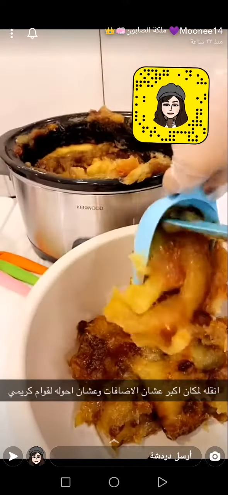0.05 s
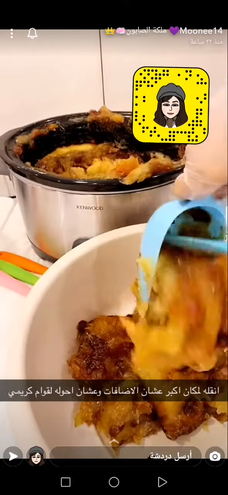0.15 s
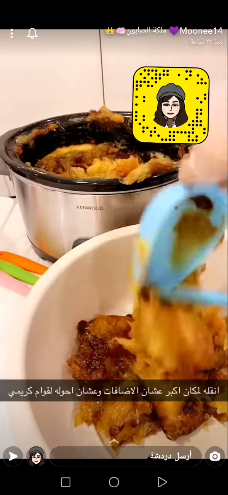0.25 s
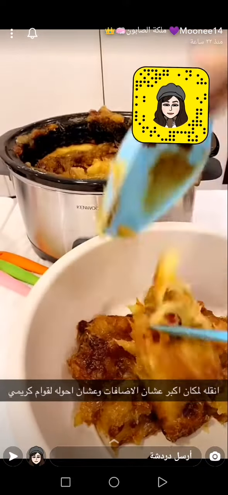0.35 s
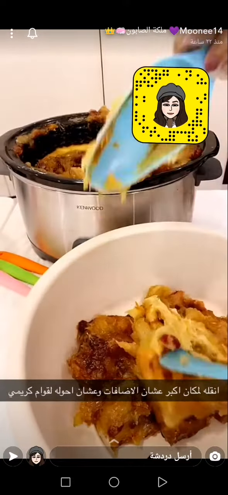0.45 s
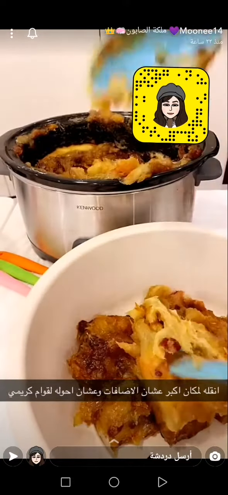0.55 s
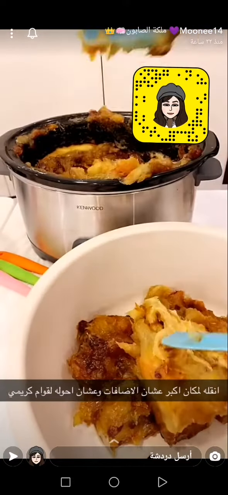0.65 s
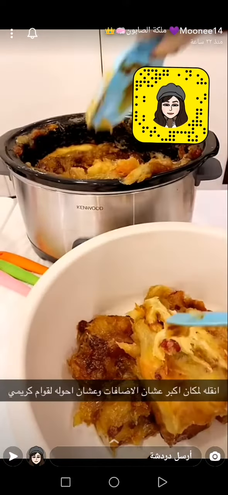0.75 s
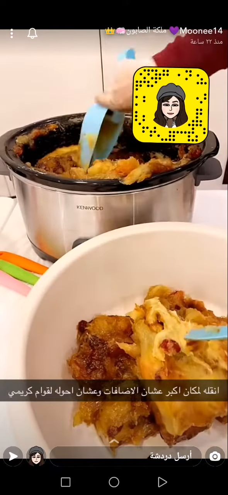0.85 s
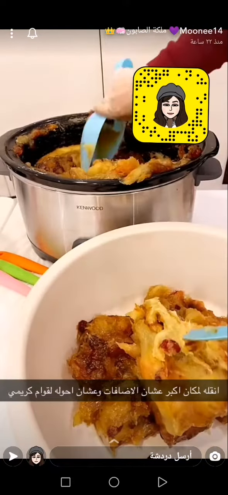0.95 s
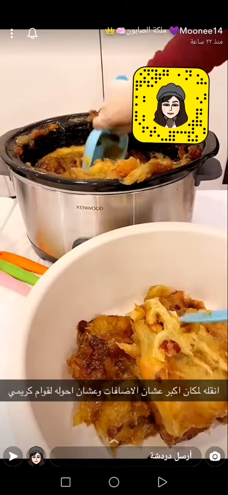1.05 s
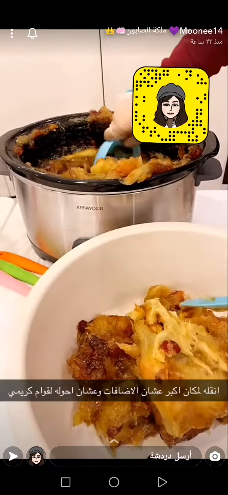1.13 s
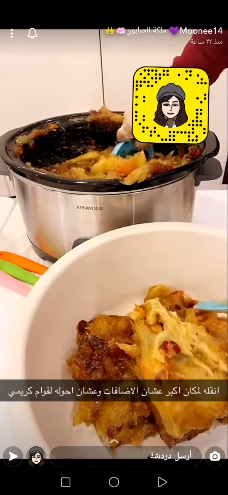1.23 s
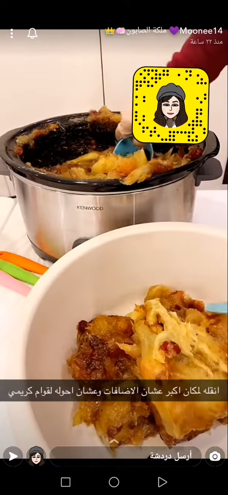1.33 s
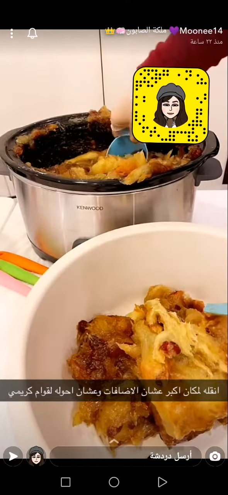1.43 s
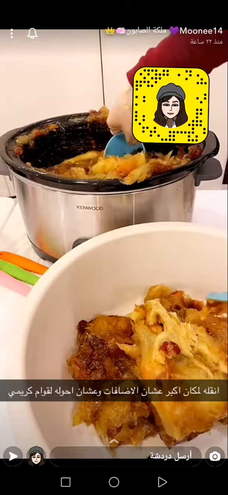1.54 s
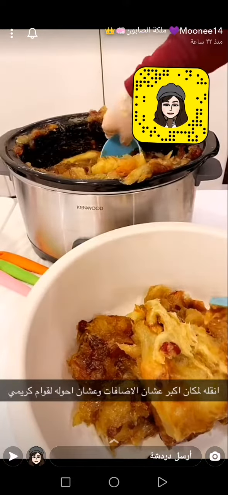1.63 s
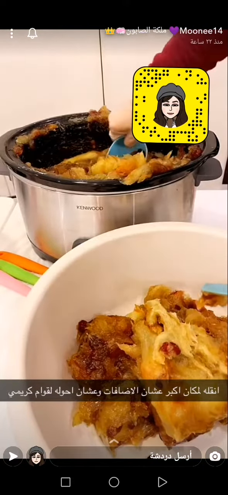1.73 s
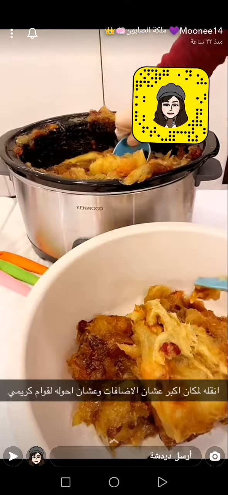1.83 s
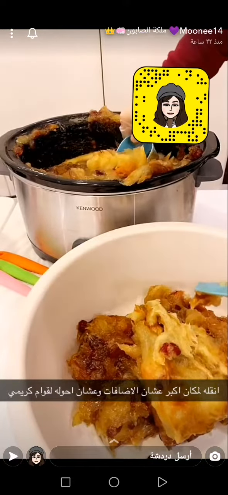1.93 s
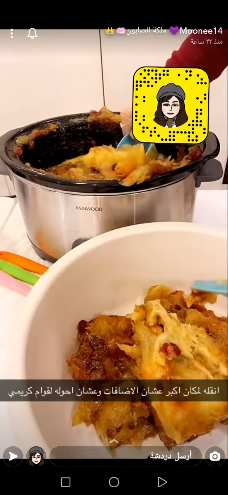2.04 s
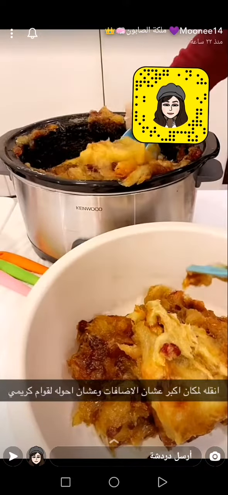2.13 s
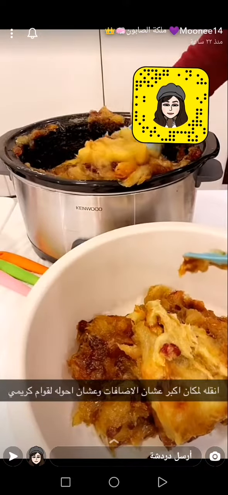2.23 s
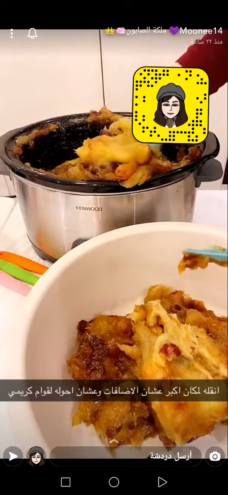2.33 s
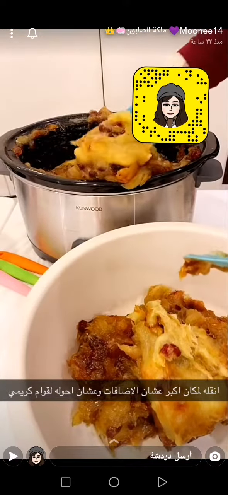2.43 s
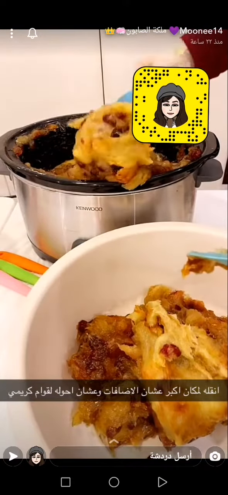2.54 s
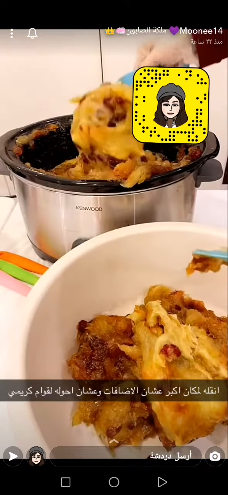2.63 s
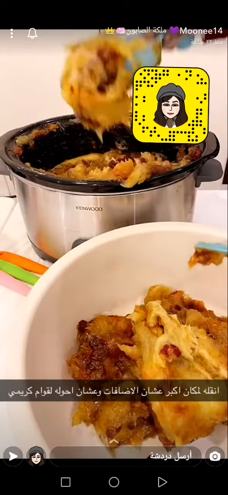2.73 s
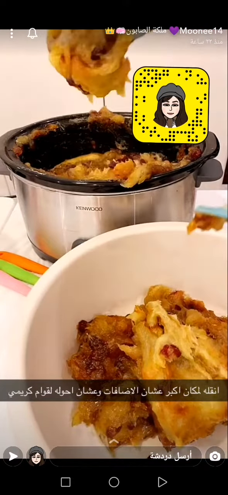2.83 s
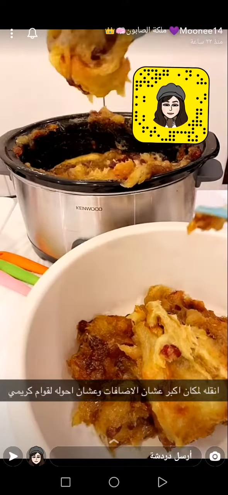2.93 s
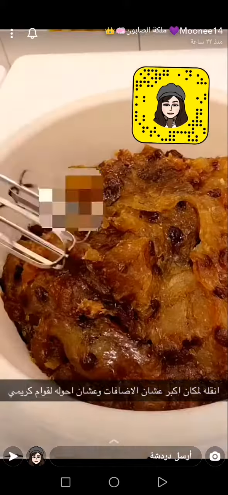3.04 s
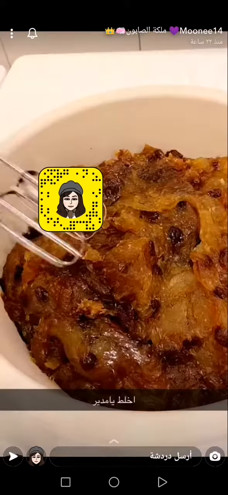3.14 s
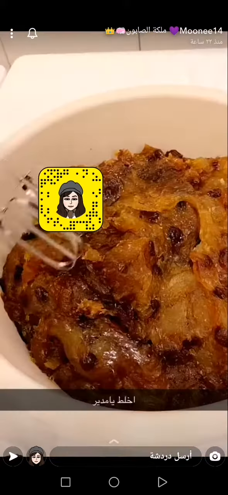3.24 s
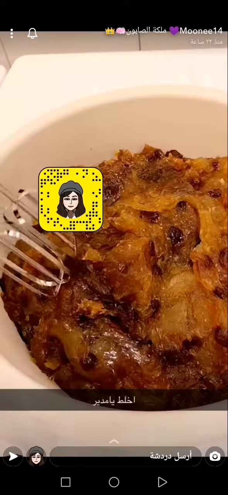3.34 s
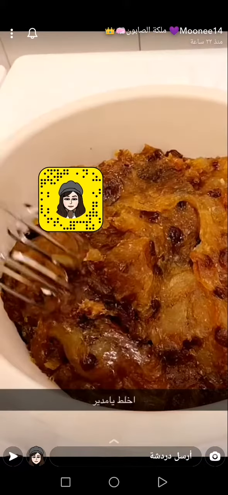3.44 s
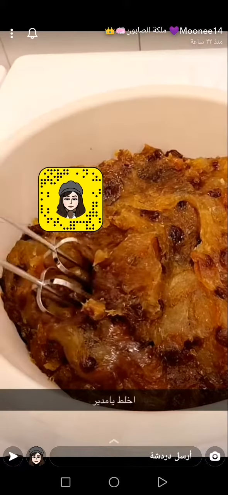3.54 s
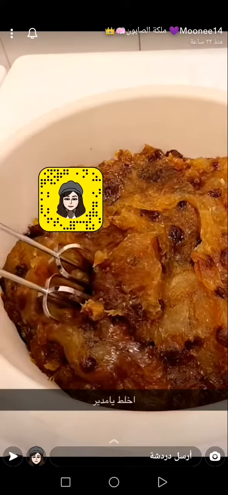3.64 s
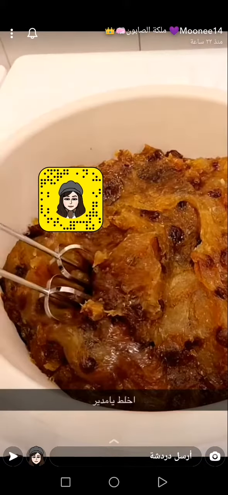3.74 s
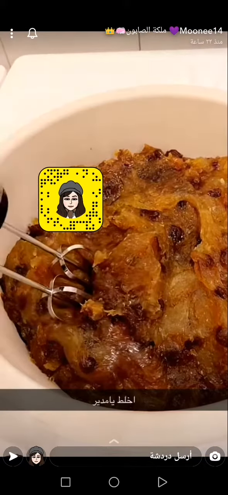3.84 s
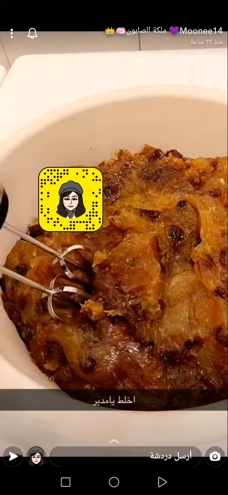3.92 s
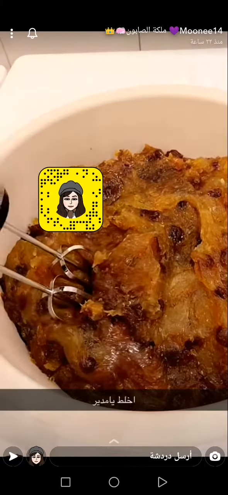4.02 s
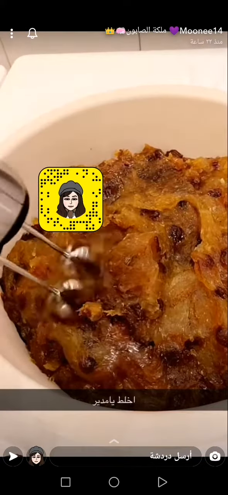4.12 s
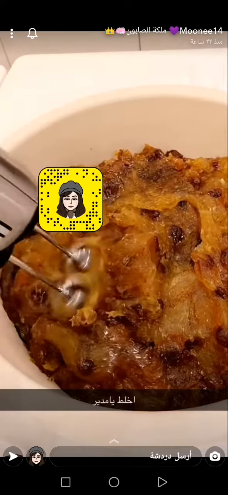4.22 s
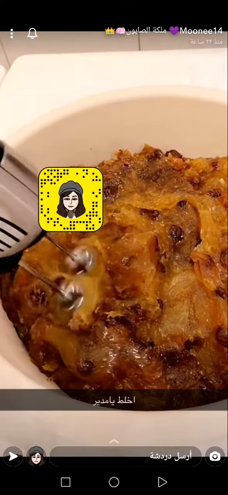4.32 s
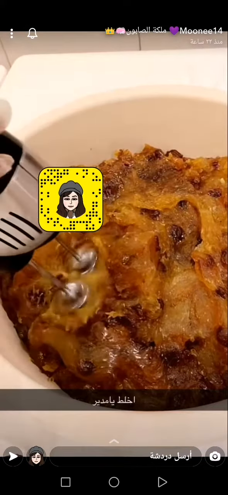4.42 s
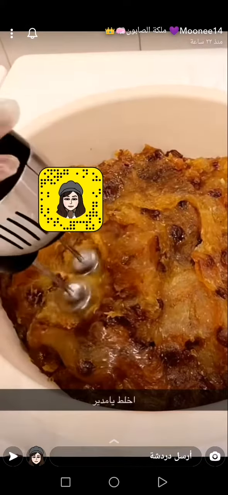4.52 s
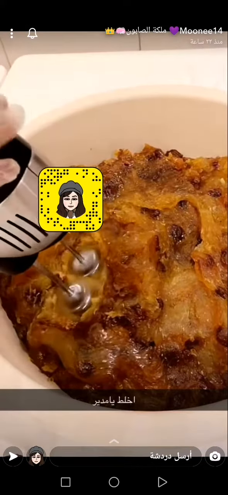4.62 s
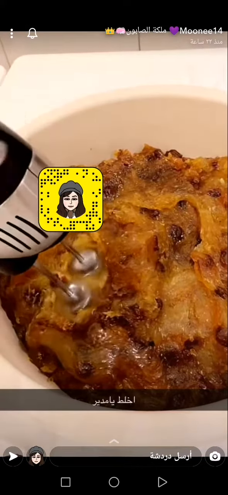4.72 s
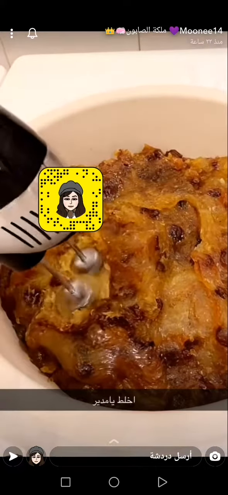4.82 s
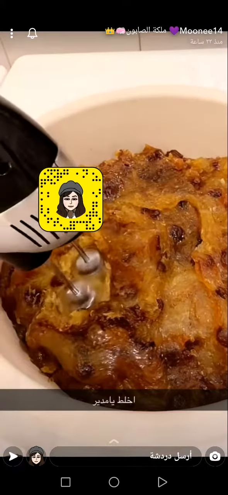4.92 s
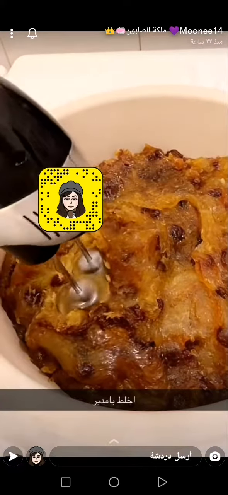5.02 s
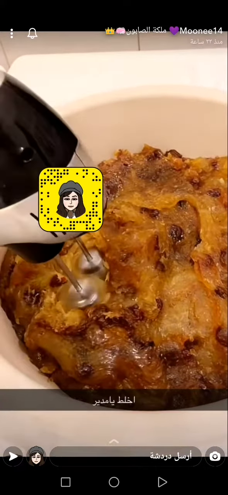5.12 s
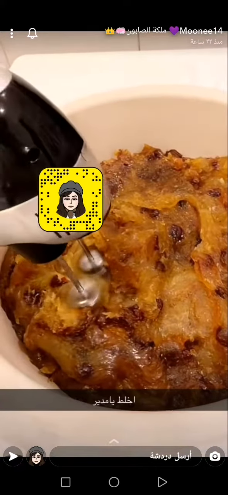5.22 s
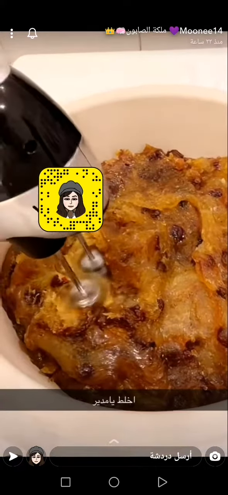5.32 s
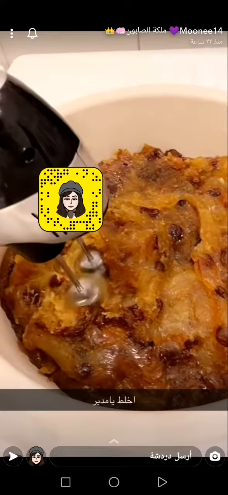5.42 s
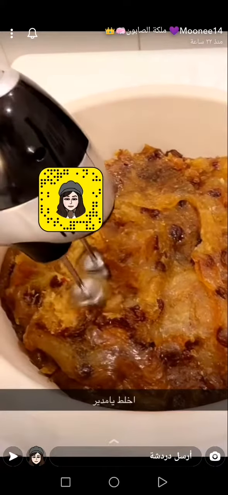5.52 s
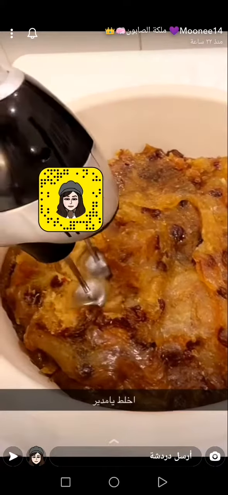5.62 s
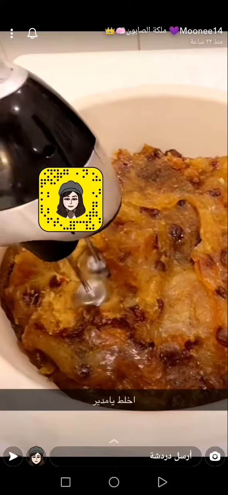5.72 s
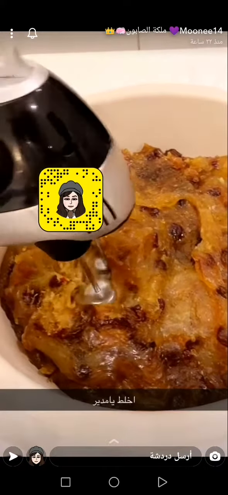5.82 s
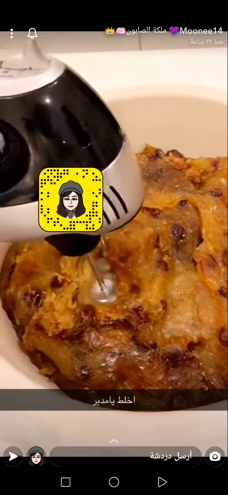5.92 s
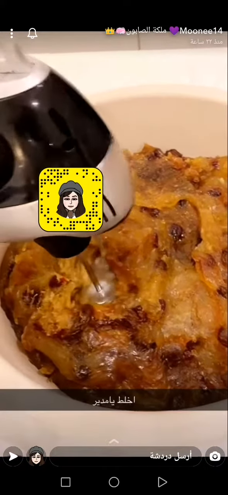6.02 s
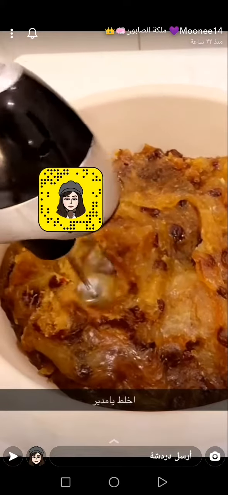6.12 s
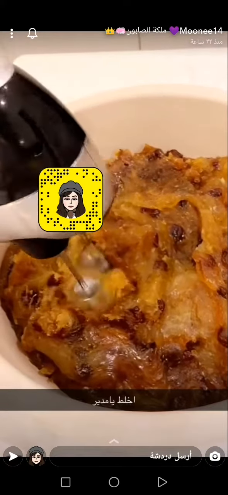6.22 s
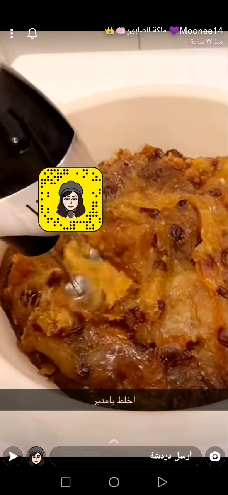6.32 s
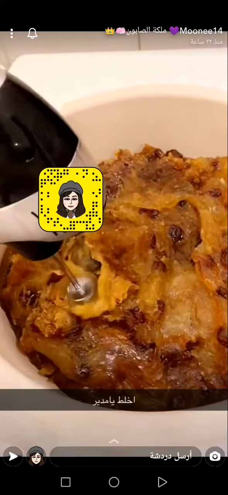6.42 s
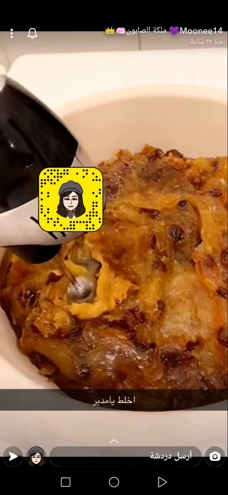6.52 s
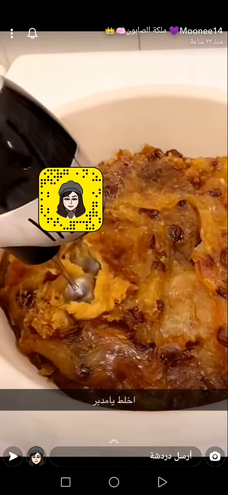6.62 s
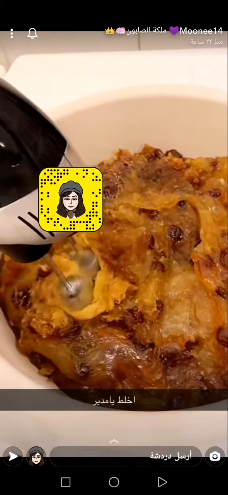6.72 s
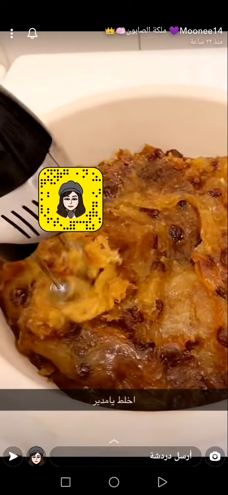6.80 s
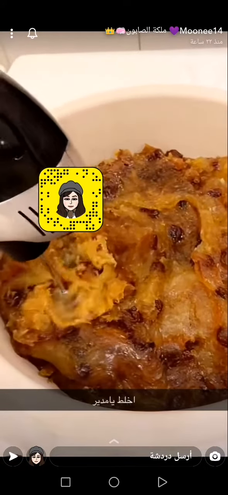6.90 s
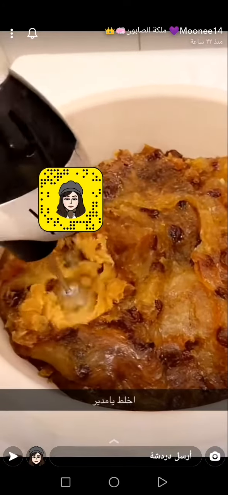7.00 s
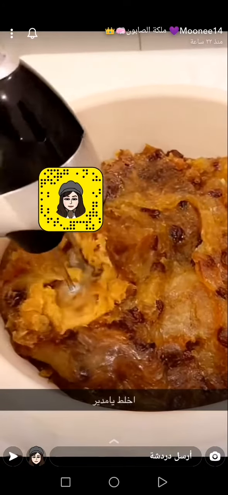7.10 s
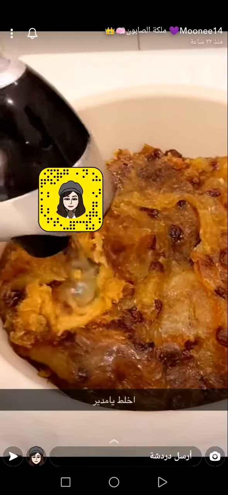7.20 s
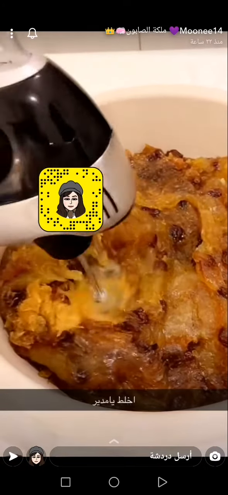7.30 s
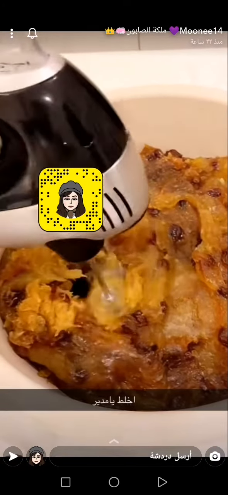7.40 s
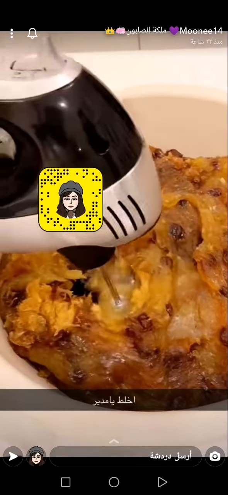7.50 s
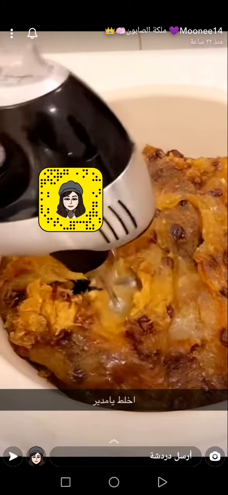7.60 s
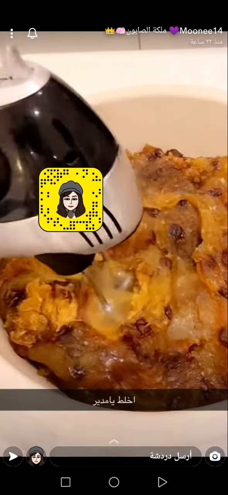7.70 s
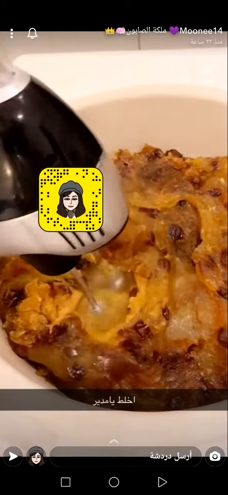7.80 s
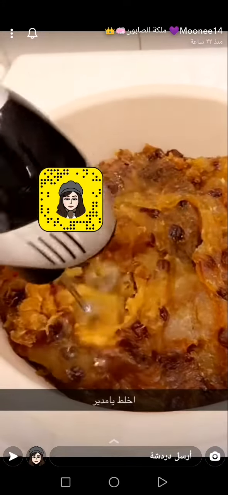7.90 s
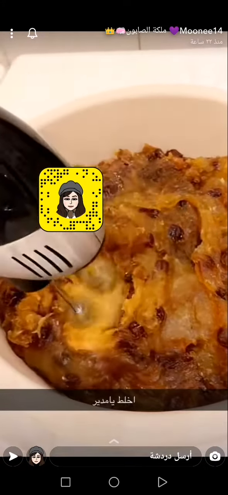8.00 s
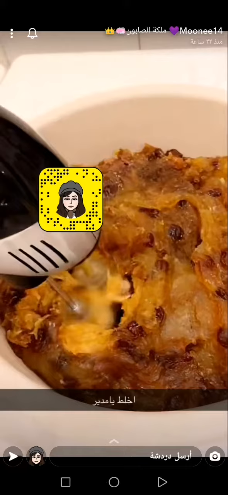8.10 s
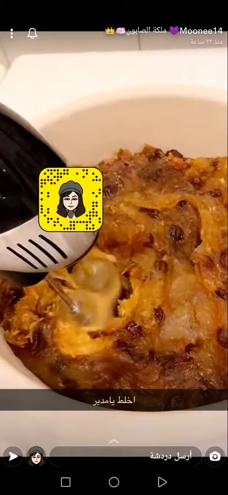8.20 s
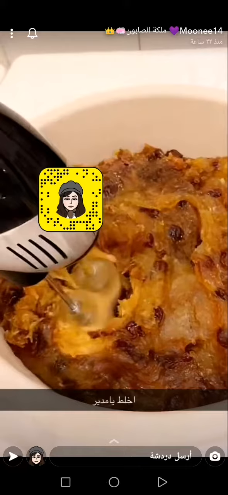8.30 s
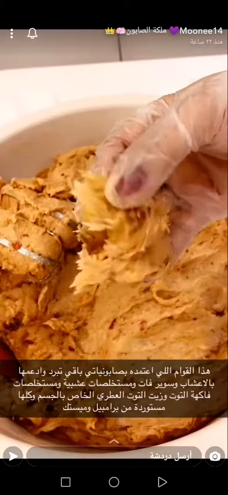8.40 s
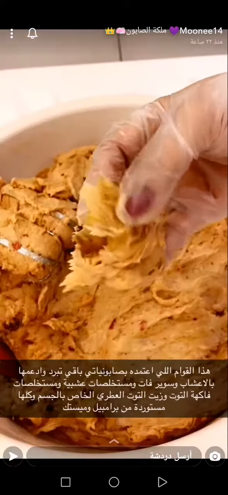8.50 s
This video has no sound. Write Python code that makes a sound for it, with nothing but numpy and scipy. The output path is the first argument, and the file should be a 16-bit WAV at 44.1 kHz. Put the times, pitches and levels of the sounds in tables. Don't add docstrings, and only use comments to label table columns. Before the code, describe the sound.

A quiet kitchen heard by one close microphone, centred, with low room tone and a faint cooler hum that swells and fades. From 0 to 3 seconds sticky paste is scooped, scraped and dropped: soft hissing rubs, wet smacks and small dull taps, busiest around 0.3 to 1.2. At about 3.1 a total silence lasts roughly a tenth of a second. Until 4.2 there are sparse rubs and beater knocks, the firmest near 3.8. At 4.26 a switch snaps loudly; the motor jolts, gears knock around 4.5, and a whine climbs quickly to a high, harsh, buzzing tone by about 4.8. The mixer then beats steadily, its pitch wavering slightly, with rushing fan air, gritty gears and low bowl rumble that thickens near 6.0 and 7.6. At 8.4 it cuts off dead; after a brief silence only faint kitchen tone remains.

```python
import sys
import numpy as np
from scipy import signal
from scipy.fft import rfft, irfft, next_fast_len
from scipy.io import wavfile
from scipy.ndimage import uniform_filter1d

SR = 44100
rng = np.random.default_rng(int(sys.argv[2]) if len(sys.argv) > 2 else 0)


def volts_from_db(level):
    exponent = np.asarray(level, float) / 20
    return 10 ** exponent


def generate_wav(sig):
    pcm = np.round(np.clip(np.atleast_2d(sig).T, -1, 1) * 32767).astype(np.int16)
    wavfile.write(sys.argv[1], SR, pcm)


N = 377055
T = np.arange(N) / SR

# (frequency [Hz], density [dB per Hz])
ROOM_SPECTRUM = [(15, -71.5), (25, -40.5), (65, -12.5), (98, -13.5), (123, 0.5), (160, -7.5), (227, -3),
                 (259, -11), (355, -7), (494, -14), (900, -19), (1170, -28.5), (1980, -120)]
ROOM_DB, MIC_HISS_DB = -58, -79
# (frequency [Hz], level [dB])
COOLER_HUM = [(134.6, -65), (188.4, -73), (355.3, -75.5), (410, -72)]
# (start [s], length [s], level [dB])
COOLER_SWELLS = [
    (-0.1, 0.55, -64.5),
    (0.66, .15, -68),
    (1.064, 0.6, -60),
    (2.25, 0.634, -61),
    (3.238, .83, -60.5),
    (4.21, 5.0, -63),
]
SWELL_HZ, SWELL_RISE_DB_PER_S, SWELL_FALL_DB_PER_S = 231.4, 78, 180

# (peak time [s], time to fade 10 dB [s], or if negative to rise 10 dB, hiss level
# [dB], dull level [dB])
PASTE_STROKES = [(0.04, .3, -67, -67.5), (0.265, 0, -62, -67), (0.368, .05, -52, -57.5),
                 (0.525, -0.03, -51, -56), (0.668, -0.1, -69, -82), (0.82, 0.9, -66, -68.5),
                 (1.095, 0.11, -55.5, -58), (1.26, 0.16, -59.5, -60.5), (1.4, 0.24, -62.5, -64),
                 (1.53, 0.1, -60, -61), (1.72, 0.2, -65, -65), (1.915, 0.02, -71.5, -58),
                 (2.047, .08, -67, -65.5), (2.139, 0.14, -61, -62.5), (2.258, 0.2, -72, -65),
                 (2.5, 0.4, -65.5, -65), (2.66, 0.04, -62.5, -68), (2.73, -0.04, -66, -63),
                 (2.85, 0.15, -66, -70), (3.28, 0.1, -66, -74.5), (3.527, 0.25, -68.5, -70),
                 (3.705, -0.05, -61, -70), (3.83, 0.02, -70, -55), (4.0, 0.5, -67.5, -73),
                 (4.19, 1, -80, -71)]
# (frequency [Hz], density [dB per Hz])
RUB_HISS = [(2600, -10), (3400, 0), (6000, -1), (9000, -3.5), (13000, -3.5), (15900, -13.5)]
# (frequency [Hz], density [dB per Hz])
RUB_BODY = [(600, -8.5), (1000, -3), (1500, -1.5), (2200, -5), (3000, -6.5), (4200, -19.5)]
STROKE_RISE_SHARE, REST_HISS_DB, REST_DULL_DB = 0.63, -78.5, -74

# (time [s], peak [dB], ring [Hz], snap [dB])
UTENSIL_TAPS = [(0.1187, -42, 1030, -63), (0.2983, -54, 3490, -52), (0.3237, -45, 2440, -52),
                (0.519, -38, 1460, -42), (0.6769, -50, 826, -55), (0.7921, -47, 2130, -64),
                (0.862, -46, 3000, -70.5), (1.0017, -41, 3170, -62), (1.085, -39.5, 950, -61),
                (1.1912, -52, 4970, -61), (1.9036, -52.5, 2300, -70), (2.0273, -41.5, 3340, -65),
                (2.1092, -50, 2060, -59), (2.1306, -43, 1040, -52), (2.4269, -46, 867, -64),
                (2.644, -52, 942, -60), (2.7153, -48.5, 950, -60), (2.8505, -56, 988, -66),
                (2.9263, -44, 829, -67), (3.206, -46.5, 945, -62), (3.2521, -47, 877, -53),
                (3.518, -40, 784, -57), (3.698, -40.5, 4100, -46), (3.8203, -32.5, 1573, -50.5),
                (3.9894, -38, 3870, -80)]
# (time [s], peak [dB], ring [Hz], snap [dB])
SWITCH_SNAPS = [
    (4.241, -40, 498, -56),
    (4.261, -18.5, 2273, -48),
    (4.263, -20.5, 2280, -42),
    (4.267, -21, 630, -55),
    (4.273, -21.5, 447, -44),
    (4.28, -29, 1550, -45.5),
]
# (time [s], peak [dB], ring [Hz], snap [dB])
GEAR_CATCHES = [
    (4.495, -21, 2460, -40),
    (4.517, -19.5, 2510, -40),
    (4.564, -19.5, 2480, -39),
]

# (time [s], settled slot tone [Hz])
SETTLED_PITCH = [(4.7, 5165), (5.4, 5275), (5.72, 5220), (5.85, 5258), (5.96, 5115), (6.09, 5150),
                 (6.3, 5445), (6.45, 5335), (6.82, 5405), (6.93, 5150), (7.2, 5525), (7.35, 5575),
                 (7.52, 5160), (7.68, 5190), (7.92, 5615), (8.1, 5360), (8.22, 5365), (8.32, 5495)]
# (time [s], whine facing the microphone [dB], shaft leaning on the bowl [dB], beaters'
# depth in the paste [dB])
HAND_GRIP = [(4.75, -33, -51, -1), (4.92, -28, -51.5, -1.5), (5.1, -30, -52, -2), (5.35, -28, -48.5, -2),
             (5.55, -25, -51.5, -0.5), (6.02, -24, -45, 5), (6.14, -23.5, -42, 2.5), (6.3, -28, -72, -1),
             (6.62, -26, -62, 2.5), (6.8, -27.5, -56, -2.5), (6.91, -31.5, -61, -1.5),
             (7.1, -29.5, -60, -1.5), (7.3, -30, -55, -3), (7.42, -25, -58, -0.5), (7.62, -33, -51, 5),
             (7.86, -31.5, -59, -6), (8.1, -32, -65.5, -3), (8.39, -31.5, -64, -3.5)]
SLOTS, MAINS_PULSE_HZ, PULSE_TOP_S = 12, 120.07, 5.1059
START_S, SPIN_UP_S, SPIN_UP_HZ = 4.28, 0.165, 3810
BITE_S, BITE_LENGTH_S, BITE_HZ = 4.51, 0.075, 350

# (frequency [Hz], density [dB per Hz])
BOWL_RUMBLE = [(24, -59.5), (40, -27), (59, -34), (90, -7), (129, -8.5), (183, -0.5), (297, -12),
               (330, -35), (430, -43.5), (730, -120)]
# (frequency [Hz], density [dB per Hz])
GEAR_NOISE = [(180, -44.5), (300, -19), (368, -3.5), (1080, -5.5), (1150, -4), (1360, -5.5), (2800, -6),
              (3640, -38.5), (6160, -120)]
# (frequency [Hz], width [Hz], level [dB])
GEAR_MODES = [(1014, 29, -5.5), (1158, 11, 4), (1540, 55, -8), (2280, 55, -8.5)]
# (frequency [Hz], density [dB per Hz])
CASING_NOISE = [(2500, -24), (2900, -8), (3150, -4.5), (3450, -3), (3800, -4), (4150, -8.5), (4600, -4.5),
                (5200, -6.5), (5650, -7), (5950, -9.5), (6250, -25.5)]
# (frequency [Hz], width [Hz], level [dB])
CASING_MODES = [(3065, 29, 2), (3200, 20, 1), (3277, 60, -2), (3802, 56, 3), (3916, 30, 3), (4720, 37, -3)]
# (frequency [Hz], density [dB per Hz])
VENT_AIR = [(6200, -1), (6600, -6), (7000, -2.5), (8000, -3), (8640, -4), (9180, -2.5), (9840, -3.5),
            (10500, -2.5), (11500, -8.5), (12800, -5), (14400, -7.5), (15100, -5.5), (15900, -6.5)]
# (level [dB], power of speed [-], switch-on burst [dB])
CASING_STRENGTH = (-31.0, 2.17, -33)
# (level [dB], power of speed [-], switch-on burst [dB])
GEAR_STRENGTH = (-37.5, 0.9, -43)
# (level [dB], power of speed [-], switch-on burst [dB])
VENT_STRENGTH = (-37.5, 1.85, -42)
# (level [dB], power of speed [-], switch-on burst [dB])
BOWL_STRENGTH = (-44, 2.1, -49)
BURST_S = 0.017
VENT_FOLLOWS_DEPTH = -0.17

# (frequency [Hz], level [dB])
WHINE_COLOUR = [(1000, -3), (4600, -3), (4900, -3.5), (5040, -2.5), (5135, 8), (5235, 1.5), (5350, 4.5),
                (5430, -14), (5500, -3.5), (5575, -8.5), (5655, 5), (5730, -12.5), (5880, -13),
                (6300, -20.5)]
# (slot tone [Hz], level [dB])
WHINE_BY_PITCH = [(1360, -9), (1950, -0.5), (2600, -6.5), (3100, -8), (3800, -5), (4250, -14), (4650, -9.5),
                  (4900, 0)]
# (slot tone [Hz], level [dB])
OCTAVE_BY_PITCH = [(1360, -62), (1950, -51.5), (2500, -40), (3300, -46.5), (3700, -43.5), (4750, -46.5),
                   (5150, -50), (5550, -49.5)]
# (frequency [Hz], width [Hz], level [dB])
SHELL_MODES = [(1500, 94, 8), (2080, 70, 6), (2370, 90, 2.5)]
# (frequency [Hz], level [dB])
STATOR_HUM = [(120, -59.5), (240, -57.5), (360, -56.5)]

TREBLE_GAPS = [0.283, 0.306, 0.7, 2.163, 2.188, 3.245, 3.687, 3.803]
TREBLE_GAP_S = 0.004
# (start [s], stop [s])
SILENCES = [
    (3.075, 3.206),
    (8.385, 8.518),
]
TOP_HZ, THIN_FROM_HZ, SPARSE_FROM_HZ = 15800, 2500, 9500


def rms_one(x):
    return x / np.sqrt(np.mean(x ** 2) + 1e-20)


def in_time(rows):
    s, *columns = np.transpose(rows)
    return [np.interp(T, s, c) for c in columns]


def by_pitch(points, hz):
    table_hz, table_db = np.transpose(points)
    return np.interp(np.log(hz), np.log(table_hz), table_db)


def drift(rate_hz):
    r = np.exp(-2 * np.pi * 20 * rate_hz / SR)
    slow = signal.lfilter([1], [1, -2 * r, r * r], rng.standard_normal(N // 20 + 4002))[4000:]
    return np.interp(np.arange(N) / 20, np.arange(len(slow)), rms_one(slow))


def colour(x, points):
    size = next_fast_len(N)
    hz, db = np.transpose(points)
    octave = np.log2(np.maximum(np.arange(size // 2 + 1) * SR / size, 1))
    beyond = np.maximum(np.log2(hz[0]) - octave, 0) + np.maximum(octave - np.log2(hz[-1]), 0)
    gain = volts_from_db(np.interp(octave, np.log2(hz), db) - 40 * beyond)
    return irfft(rfft(x, size) * gain, size)[:N]


def resonance(x, hz, width_hz):
    r = np.exp(-np.pi * width_hz / SR)
    top = np.array([1, 0, -1]) * (1 - r * r) / 2
    return signal.lfilter(top, [1, -2 * r * np.cos(2 * np.pi * hz / SR), r * r], x)


def ringing(x, rings):
    return rms_one(x + sum(volts_from_db(db) * resonance(x, hz, width) for hz, width, db in rings))


def rush(points, patchy_db):
    return rms_one(colour(rng.standard_normal(N), points) * volts_from_db(patchy_db * drift(13.4)))


def kitchen():
    hum = np.zeros(N)
    for hz, db in COOLER_HUM:
        hum += volts_from_db(db + 2.5 * drift(1.5)) * np.sin(2 * np.pi * hz * T + 0.5 * drift(2))
    swells_db = []
    for s, length, db in COOLER_SWELLS:
        rise = SWELL_RISE_DB_PER_S * (s - T)
        fall = SWELL_FALL_DB_PER_S * (T - s - length)
        swells_db.append(db - np.maximum(rise, fall).clip(0))
    swell = volts_from_db(np.max(swells_db, axis=0))
    hum += swell * np.sin(2 * np.pi * SWELL_HZ * T + 0.4 * drift(2))
    room = volts_from_db(ROOM_DB) * rush(ROOM_SPECTRUM, patchy_db=1.7)
    return room + np.sqrt(2) * hum + volts_from_db(MIC_HISS_DB) * rng.standard_normal(N)


def stroke_gain(column, rest_db):
    power = volts_from_db(2 * rest_db) * np.ones(N)
    for row in PASTE_STROKES:
        near = slice(max(int((row[0] - 0.8) * SR), 0), int((row[0] + 0.8) * SR))
        age = (T[near] - row[0]) / row[1]
        power[near] += volts_from_db(2 * row[column] - 20 * np.maximum(age, -age / STROKE_RISE_SHARE))
    return np.sqrt(power)


def rubbing():
    bright = rms_one(colour(rng.standard_normal(N) * volts_from_db(1.85 * drift(120)), RUB_HISS))
    dull = colour(rng.standard_normal(N) * volts_from_db(1.7 * drift(44)), RUB_BODY)
    dull = ringing(dull, [(2310, 160, -0.1), (3210, 230, -1)])
    hiss_gain = stroke_gain(column=2, rest_db=REST_HISS_DB)
    return hiss_gain * bright + stroke_gain(column=3, rest_db=REST_DULL_DB) * dull


def knocks(events, t60, share):
    out, age = np.zeros(N + SR), np.arange(SR // 10) / SR
    low = signal.butter(2, 7000, "low", fs=SR, output="sos")
    high = signal.butter(2, 7000, "high", fs=SR, output="sos")
    ring_envelope = volts_from_db(-60 * age / t60) * np.minimum(age / 0.00073, 1)
    crack_envelope = volts_from_db(-60 * age / 0.005) + 0.21 * volts_from_db(-60 * age / 0.079)
    for s, db, hz, snap_db in events:
        noise = rng.standard_normal(len(age))
        crack = noise * crack_envelope
        dull_crack = signal.sosfilt(low, crack)
        rough = 0.84 * signal.sosfilt(low, noise[::-1])
        ring = (np.sin(2 * np.pi * hz * age) + rough) * ring_envelope
        snap = volts_from_db(snap_db + 7.5) * signal.sosfilt(high, crack)
        at = round(s * SR)
        out[at:at + len(age)] += volts_from_db(db) * (share * dull_crack + (1 - share) * ring) + snap
    return signal.sosfilt(signal.butter(2, 350, "high", fs=SR, output="sos"), out[:N] + 1e-18)


def since_start():
    return np.maximum(T - START_S, 0)


def mains_pulse(sharpness):
    lag = 0.0025 * np.exp(-since_start() / 0.61)
    return np.exp(sharpness * (np.cos(2 * np.pi * MAINS_PULSE_HZ * (T - PULSE_TOP_S - lag)) - 1))


def slot_hz():
    settled = uniform_filter1d(in_time(SETTLED_PITCH)[0], size=SR // 25)
    missing = SPIN_UP_HZ * np.exp(-since_start() / SPIN_UP_S)
    sag = BITE_HZ * np.exp(-((T - BITE_S) / BITE_LENGTH_S) ** 2 / 2)
    return settled - missing - sag


def jolt():
    shake = rng.standard_normal(N) * mains_pulse(sharpness=0.56) * np.exp(-since_start() / 0.026)
    low, high = resonance(shake, 1370, 550), resonance(shake, 4000, 700)
    return volts_from_db(-11.5) * resonance(low, 1600, 550) + volts_from_db(-18) * resonance(high, 4100, 700)


def motor_rush():
    speed, age = slot_hz() / SETTLED_PITCH[1][1], since_start()
    depth_db = in_time(HAND_GRIP)[2]

    def gain(strength):
        db, power, burst_db = strength
        return volts_from_db(db) * speed ** power + volts_from_db(burst_db) * np.exp(-age / BURST_S)

    gears = ringing(rush(GEAR_NOISE, patchy_db=0.5), [(hz, width, db + 5.5) for hz, width, db in GEAR_MODES])
    casing = ringing(rush(CASING_NOISE, patchy_db=0.91), CASING_MODES)
    vent = ringing(rush(VENT_AIR, patchy_db=0.9), [(8130, 250, -4), (9090, 81, 0.5)])
    vent = volts_from_db(VENT_FOLLOWS_DEPTH * depth_db + 0.5 * drift(2.1)) * vent
    bright = gain(CASING_STRENGTH) * casing + gain(GEAR_STRENGTH) * gears + gain(VENT_STRENGTH) * vent
    throb = np.clip(0.59 * np.exp(-age / 0.078) + 0.01, 0, 1)
    bright = bright * (1 - throb + throb * rms_one(mains_pulse(sharpness=0.42)))
    bowl = ringing(rush(BOWL_RUMBLE, patchy_db=1.5), [(180.8, 10, 1.7)])
    return bright + gain(BOWL_STRENGTH) * volts_from_db(depth_db + 1.1 * drift(6.5)) * bowl


def motor_tones():
    facing_db, shaft_db, _ = in_time(HAND_GRIP)
    pitch = slot_hz()
    turn = 2 * np.pi * np.cumsum(pitch) / SR
    strain = np.exp(-since_start() / 0.18)
    wobble = 0.22 * drift(27) + (0.094 + 1.9 * strain) * drift(150)
    skew = 0.54 * np.sin(2 * np.pi * MAINS_PULSE_HZ * (T - PULSE_TOP_S))

    pulse = mains_pulse(sharpness=4.5 - 2.2 * strain) * volts_from_db(1.1 * drift(30))
    whine = colour(pulse * np.sin(turn + wobble + skew), WHINE_COLOUR)
    whine = whine / np.sqrt(uniform_filter1d(whine ** 2, size=SR // 12) + 1e-9)
    whine = volts_from_db(facing_db + by_pitch(WHINE_BY_PITCH, pitch)) * whine
    whine = whine + sum(volts_from_db(db) * resonance(whine, hz, width) for hz, width, db in SHELL_MODES)

    octave = rms_one(mains_pulse(sharpness=0.54) * np.sin(2 * (turn + wobble) + 0.45 * drift(200)))
    octave = volts_from_db(by_pitch(OCTAVE_BY_PITCH, pitch) + 2.5 * drift(4)) * octave

    shaft = np.sqrt(2) * np.sin(turn / SLOTS + 0.3 * drift(2.6))
    shaft = volts_from_db(shaft_db - 34 * strain + 1.2 * drift(5)) * shaft
    twice = np.sqrt(2) * np.sin(2 * turn / SLOTS + 1.56 * drift(5))
    twice = volts_from_db(-52.5 - 60 * strain + 2.5 * drift(5.1)) * twice

    hum = np.zeros(N)
    for hz, db in STATOR_HUM:
        hum += volts_from_db(db + 10.4 * strain + 1.25 * drift(2.1)) * np.sqrt(2) * np.sin(2 * np.pi * hz * T)
    return whine + octave + shaft + twice + hum


def scene():
    running = np.clip((T - START_S) / 0.0023, 0, 1) * (T < SILENCES[1][1] - 0.05)
    hits = knocks(UTENSIL_TAPS, t60=0.0265, share=0.72)
    hits = hits + knocks(SWITCH_SNAPS, t60=0.016, share=0.55) + knocks(GEAR_CATCHES, t60=0.016, share=0.5)
    mix = kitchen() + rubbing() + hits + running * (jolt() + motor_rush() + motor_tones())
    return np.stack([mix, mix])


def thinned(x, masked_db, under_db, thin_db):
    hz, _, z = signal.stft(x, SR, "cosine", nperseg=2048)
    power = abs(z) ** 2
    near = uniform_filter1d(power, size=60, axis=0)
    below = uniform_filter1d(power, size=80, axis=0, origin=36)
    band = uniform_filter1d(power, size=8, axis=0)
    keep = (power > near * volts_from_db(2 * masked_db)) & (band > below * volts_from_db(2 * under_db))
    keep &= (band > near * volts_from_db(2 * thin_db)) | (hz < SPARSE_FROM_HZ)[:, None]
    keep = (keep | (hz < THIN_FROM_HZ)[:, None]) & (hz < TOP_HZ)[:, None]
    return signal.istft(z * keep, SR, "cosine", nperseg=2048)[1][:N]


def blanked(x):
    treble = signal.sosfiltfilt(signal.butter(2, 1200, "high", fs=SR, output="sos"), x)
    hole = np.zeros(N)
    hole[(np.array(TREBLE_GAPS) * SR).astype(int)] = 1
    span = int(TREBLE_GAP_S * SR)
    hole = uniform_filter1d(uniform_filter1d(hole, size=2 * span), size=span // 2) * 2 * span
    return x - 0.85 * hole * treble


def top_cut(x):
    return signal.sosfilt(signal.butter(12, 16810, fs=SR, output="sos"), x)


def record(dry):
    sound = blanked(thinned(dry[0], masked_db=-9, under_db=-19.5, thin_db=-3))
    for start, stop in SILENCES:
        sound = sound * np.clip(np.maximum((start - T) / 0.0015, (T - stop) / 0.0003), 0, 1)
    finished = np.stack([sound, sound])
    return top_cut(finished)


dry = scene()
out = record(dry)
generate_wav(out)
```